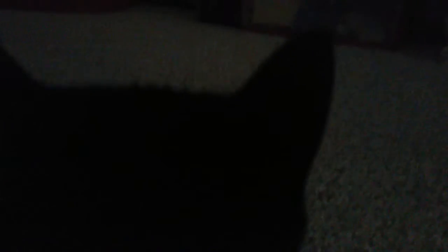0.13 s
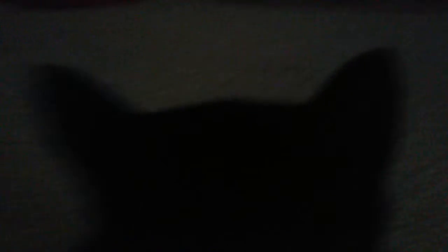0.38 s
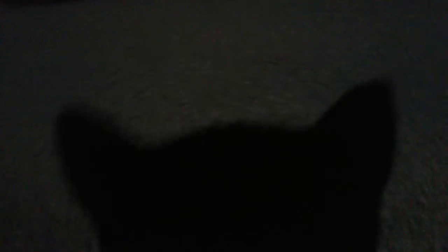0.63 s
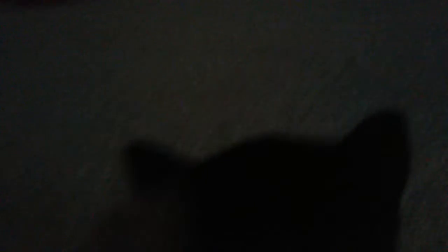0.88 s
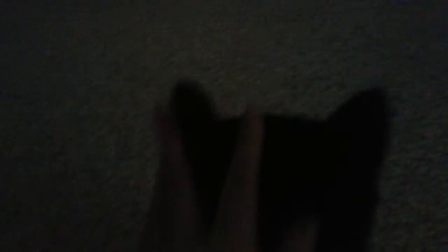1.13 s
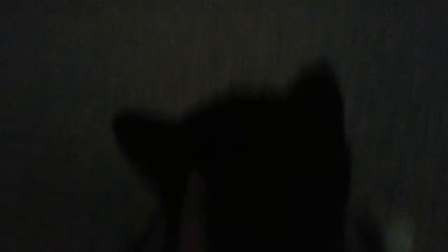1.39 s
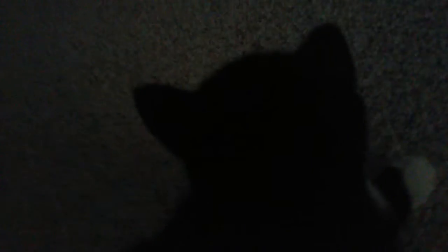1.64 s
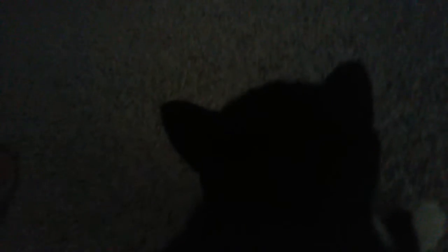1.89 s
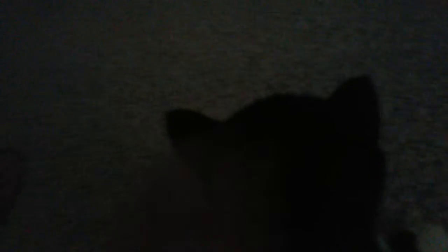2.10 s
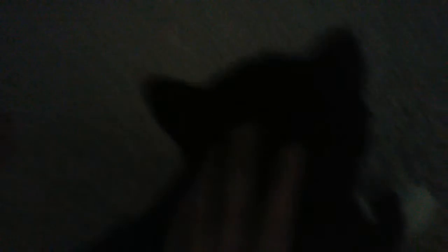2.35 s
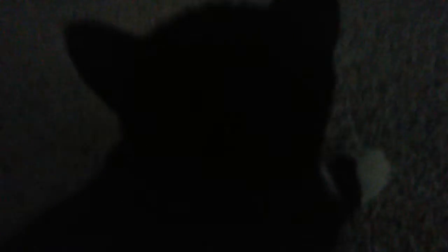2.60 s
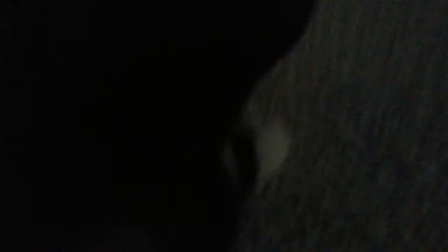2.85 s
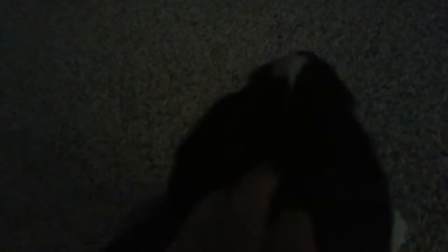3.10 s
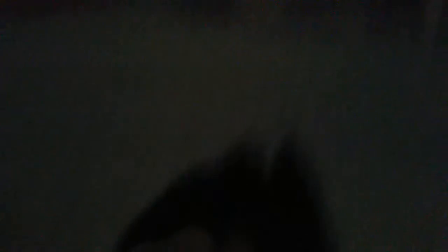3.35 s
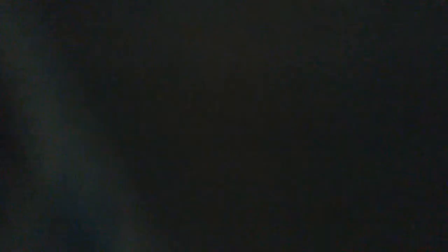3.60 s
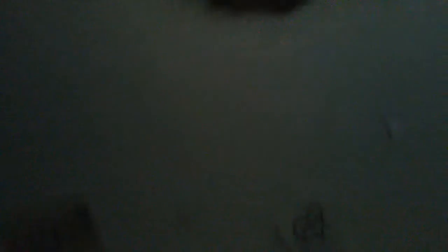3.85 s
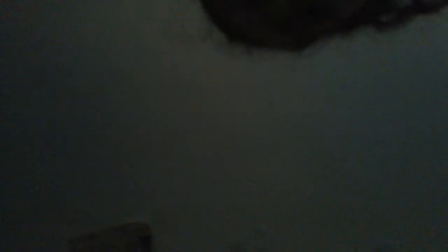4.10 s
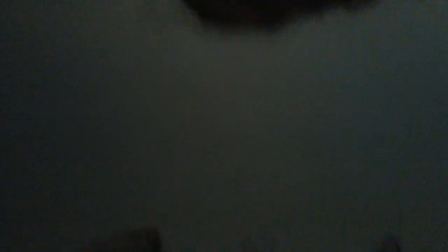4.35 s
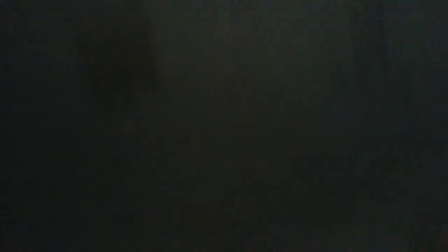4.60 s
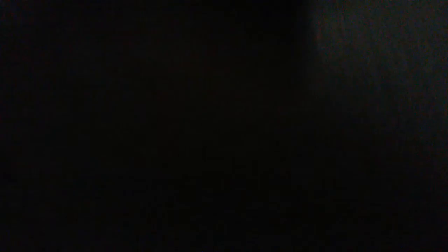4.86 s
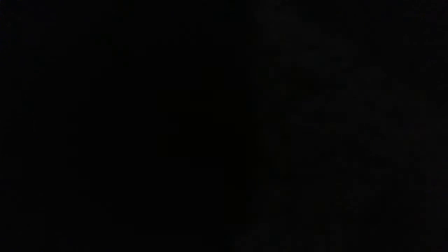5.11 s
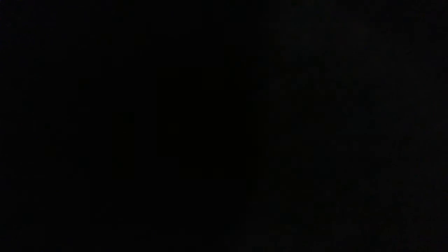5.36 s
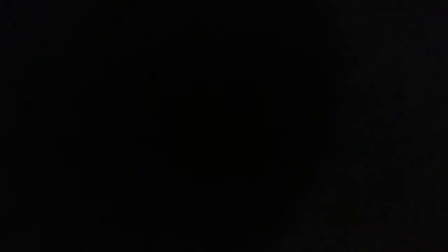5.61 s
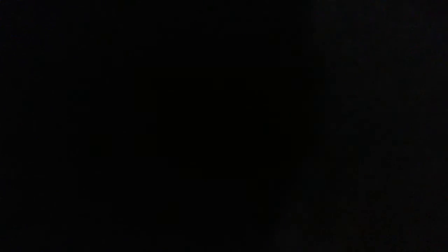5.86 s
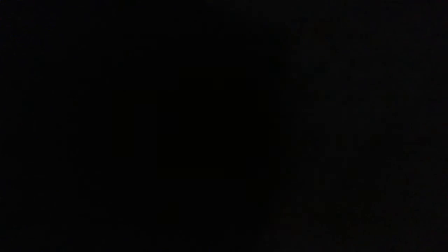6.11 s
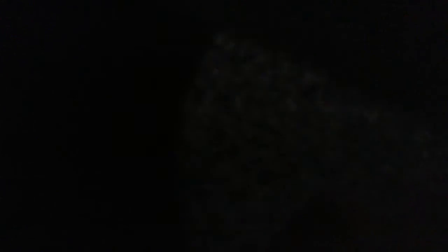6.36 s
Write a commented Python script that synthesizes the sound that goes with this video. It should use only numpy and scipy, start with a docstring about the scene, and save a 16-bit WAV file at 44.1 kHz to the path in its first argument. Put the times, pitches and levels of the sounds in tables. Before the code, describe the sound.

Close handling knocks and thumps on a hollow plastic case, with fur scuffs between them, over faint gritty hiss in a quiet carpeted room.

```python
"""A cat bumps and paws at a small hand-held camera in a quiet carpeted room, for six and a half seconds.
Light taps ring the plastic case up to one solid knock at 0.7 s, then comes a lull of faint hiss and hum.
A sharp bump breaks it at 2.8 s; the heaviest blows and thumps, with rough scuffing, crowd in from 3.5 to 4.1 s.
Lighter taps and strokes follow, with one firmer knock at 5.1 s: knocks ring damped case modes, thumps are low
swings, and strokes are dense tiny catches. The converter turns the quiet floor into a flicker between two steps."""
import sys
import numpy as np
from scipy import signal
from scipy.fft import rfft, irfft, next_fast_len
from scipy.io import wavfile
from scipy.ndimage import map_coordinates

SR = 44100
rng = np.random.default_rng(int(sys.argv[2]) if len(sys.argv) > 2 else 0)


def dump_mix(stems):
    """Bounce the given channels to the path in sys.argv[1] as a 16-bit WAV at rate SR."""
    frames = np.atleast_2d(stems).T  # one column per channel
    limited = np.clip(frames, -1, 1)  # hard clip at full scale
    pcm = np.round(limited * 32767).astype(np.int16)
    wavfile.write(sys.argv[1], SR, pcm)


def convert_level_to_amplitude(level_db):
    """Map a level in decibels to its linear amplitude factor."""
    exponent = np.asarray(level_db, float) / 20
    return 10 ** exponent


N = 285327

# resonances of the undamped plastic case: (frequency [Hz], level [dB], t60 [s])
CASE_MODES = [(216, -4, .035), (355, -2, 0.025), (520, -4.5, 0.02), (773, 0, 0.016), (1020, 2.5, 0.012),
              (1360, -3, 0.017), (1565, -8, .02), (2050, -1.5, 0.015), (2410, -5.5, .016),
              (2910, -10.5, .012), (3827, -18.5, 0.016), (6850, -18.5, 0.012)]


def rms_one(x):
    """Scales a signal to rms 1."""
    return x / np.sqrt(np.mean(x ** 2) + 1e-30)


def band(x, low_hz, high_hz):
    """Gentle band-pass."""
    return signal.sosfilt(signal.butter(2, [low_hz, high_hz], "band", fs=SR, output="sos"), x)


def coloured(x, spectrum):
    """Shapes a signal by a spectrum of (frequency [Hz], density [dB per Hz]) points; rms 1."""
    size = next_fast_len(N)
    hz, db = np.transpose(spectrum)
    bin_hz = np.maximum(np.arange(size // 2 + 1) * SR / size, 1)
    gain = convert_level_to_amplitude(np.interp(np.log(bin_hz), np.log(hz), db))
    return rms_one(irfft(rfft(x, size) * gain, size)[:N])


def drift(points_per_s):
    """Smooth random wandering; rms 1."""
    points = rng.standard_normal(int(N / SR * points_per_s) + 2)
    return rms_one(map_coordinates(points, [np.arange(N) * points_per_s / SR], order=3))


def ring(clicks, hz, t60):
    """A two-pole resonator: a unit click sets a dying sine of about height 1 ringing."""
    decay, turn = convert_level_to_amplitude(-60 / (t60 * SR)), 2 * np.pi * hz / SR
    poles = [1, -2 * decay * np.cos(turn), decay ** 2]
    return signal.lfilter([0, np.sin(turn)], poles, clicks + 1e-18)


def grains(per_s, spread_db):
    """Tiny random catches of hair and skin on the shell; rms 1."""
    sizes = convert_level_to_amplitude(spread_db * np.minimum(rng.exponential(1, N), 4))
    signs = rng.choice([-1, 1], N)
    return rms_one(sizes * signs * (rng.random(N) < per_s / SR))


def add(out, start_s, piece):
    """Mixes a piece into the track from a given time."""
    at = round(start_s * SR)
    out[at:at + len(piece)] += piece[:N - at]


def contact(contact_hz):
    """A contact drives the case modes near its own pitch most and those further away less."""
    ratio = np.transpose(CASE_MODES)[0] / contact_hz
    return ratio ** 1.294 / (1 + ratio ** 2.795)


def taps():
    """The case is pressed in, springs back and rings; a hard edge adds a brief crack at the peak."""
    # knocks on the case: (peak time [s], peak level [dB], contact pitch [Hz], crack relative to knock [dB])
    knocks = [(0.0601, -41, 437, -34), (0.0925, -39, 318, -33), (0.1221, -38, 343, -30),
              (0.155, -42, 306, -36), (0.2048, -37, 303, -36), (0.2203, -42, 300.0, -36),
              (0.2714, -43.5, 306, -25), (0.3607, -30.5, 870, -14), (0.4258, -43, 376, -38),
              (0.4766, -39, 332, -26), (0.5656, -32, 400, -6.5), (0.5807, -37.5, 450, -36),
              (0.6495, -29.5, 580, -42), (0.6877, -7.5, 330, -30), (0.7466, -35.5, 270.5, -36),
              (2.8405, -36.5, 1271, -7.5), (2.8452, -31, 286, -29), (2.8602, -10, 272, -28),
              (2.867, -25, 1500, -1), (2.8744, -15.5, 370, 3.5), (2.932, -50, 1500, 8.5),
              (2.9541, -32.5, 910, -25), (3.0224, -39, 364, -6), (3.0622, -42, 277, -36),
              (3.1605, -71, 935, 5.5), (3.173, -51.5, 900, 0.5), (3.1835, -66.5, 900, 8),
              (3.2354, -45, 587, -36), (3.3621, -26, 743, -23.5), (3.5279, -17, 373, -28.5),
              (3.5402, -9, 325, -25), (3.5468, -13, 316, -33.5), (3.5598, -7, 596, -17.5),
              (3.5627, 5, 810, -26), (3.7105, -12, 325, -11), (3.7838, 1.5, 486, -19),
              (3.8668, -16, 507, -28), (3.8723, 3, 410, -28), (3.8793, -13, 300, -19),
              (3.8973, -20.5, 350.0, -26), (3.9954, -30.5, 580, -41), (4.001, -23, 610, -15.5),
              (4.109, -11.5, 520.0, -25.5), (4.2684, -44.5, 330.0, -36), (4.3904, -49.5, 470.0, -35),
              (4.7347, -43, 915, -22), (4.8644, -39.5, 630.0, -28), (5.0836, -22.5, 260.0, -32.5),
              (5.0895, -45.5, 897, 12), (5.0962, -32, 1528, 0.5), (5.1035, -37.5, 1514, -5.5),
              (5.2274, -55, 620.0, -13), (5.549, -39.5, 353.4, -35.5), (5.6944, -45, 340.0, -33.5),
              (5.731, -47.5, 646, -24.5), (5.7576, -38.5, 610.0, -18), (6.157, -55.5, 995, -20.5)]
    out, t = np.zeros(N), np.arange(2200) / SR
    hz, mode_db, t60 = np.transpose(CASE_MODES)[:, :, None]
    # the paw stays on the case after a blow and damps the ring
    rings = np.sin(2 * np.pi * hz * t) * convert_level_to_amplitude(mode_db - 60 * t / (0.55 * t60))
    strengths = convert_level_to_amplitude(rng.normal(0, 3, (len(knocks), len(CASE_MODES))))
    noise = rng.standard_normal((len(knocks), len(t)))
    for k, (peak_s, peak_db, contact_hz, crack_db) in enumerate(knocks):
        press_in = -np.expm1(-t * contact_hz * 2.2)
        knock = (contact(contact_hz) * strengths[k]) @ rings * press_in
        knock = band(knock, 99, 4.6 * contact_hz)  # a soft pad rounds the edge of the blow
        crack = band(noise[k] * convert_level_to_amplitude(-60 * t / 0.0042), 2800, 12000)
        knock_peak = np.abs(knock).max()
        add(out, peak_s - np.abs(knock).argmax() / SR, convert_level_to_amplitude(peak_db) * knock / knock_peak)
        add(out, peak_s - 0.0007, convert_level_to_amplitude(peak_db + crack_db) * crack / np.abs(crack).max())
    return out


def thumps():
    """The whole camera rocks in the hand: a damped low swing with a soft start."""
    # swings of the body in the grip: (start time [s], peak level [dB], frequency [Hz], t60 [s])
    swings = [(0.089, -52, 187, 0.073), (0.118, -60, 178, 0.069), (0.156, -41.5, 194, 0.022),
              (0.21, -47, 172.5, 0.17), (0.27, -40, 225, 0.031), (0.477, -45, 66, 0.035),
              (0.564, -38, 125, 0.072), (0.648, -38.5, 132, 0.089), (0.69, -11.5, 97.9, 0.13),
              (0.743, -39.5, 125.4, 0.15), (2.842, -10.5, 98.5, 0.078), (2.86, -5.5, 101, 0.023),
              (2.925, -38, 49, 0.21), (3.019, -44.5, 171, 0.071), (3.06, -45, 169, 0.095),
              (3.14, -54.5, 151.7, 0.07), (3.353, -42.5, 211, 0.17), (3.55, -11, 198, 0.088),
              (3.566, -5.5, 123, 0.028), (3.712, -25.5, 212, 0.1), (3.792, -13.5, 152, 0.071),
              (3.871, -6.5, 125.3, 0.061), (3.897, -15, 109, 0.067), (3.997, -29, 218, 0.05),
              (4.109, -20.5, 182, 0.058), (4.25, -47, 88.8, 0.08), (4.312, -50.5, 142.5, 0.087),
              (4.336, -41, 120, 0.13), (4.391, -49, 120.7, 0.055), (4.82, -54, 102.2, 0.08),
              (5.081, -19.5, 199, 0.053), (5.086, -18, 131, 0.085), (5.515, -34.5, 103, 0.18),
              (5.685, -45.5, 118.6, 0.16), (5.752, -49.5, 191, 0.12), (5.89, -51, 109, 0.17)]
    wrist_hz, wrist_db, wrist_t60_s = 62.6, -11.5, 0.04
    out, t = np.zeros(N), np.arange(SR // 3) / SR
    # the wrist gives way too, with a swing of its own
    wrist = np.sin(2 * np.pi * wrist_hz * t) * convert_level_to_amplitude(wrist_db - 60 * t / wrist_t60_s)
    for start_s, peak_db, hz, t60 in swings:
        soft_start = -np.expm1(-t * hz * 3.4)
        swing = np.sin(2 * np.pi * hz * t) * convert_level_to_amplitude(-60 * t / t60) * soft_start
        swing = band(swing + wrist, 39, 1200)
        add(out, start_s, convert_level_to_amplitude(peak_db) * swing / np.abs(swing).max())
    return out


def rubbing():
    """Fur, paw and fingers stroke the shell: dense catches excite its modes, finer ones hiss in the treble."""
    # strokes, levels before pressure and unevenness:
    # (start time [s], length [s], scuff level [dB], contact pitch [Hz], fur hiss level [dB])
    strokes = [(0.022, 0.23, -63.5, 385, -73.5), (0.205, 0.3, -70, 2130, -88),
               (0.173, 0.22, -52.5, 344, -70.5), (0.408, 0.064, -69.5, 1520, -77),
               (0.351, 0.16, -58.5, 396, -78), (0.46, 0.19, -72, 565, -77), (0.558, 0.057, -57, 487, -86),
               (0.603, 0.036, -52, 1510, -53.5), (0.634, 0.02, -56.5, 1000, -62),
               (0.643, 0.034, -39, 856, -50.5), (0.671, 0.02, -34.5, 820, -45),
               (0.689, 0.016, -20, 2400, -34), (0.688, 0.2, -64, 347, -73.5),
               (0.801, 0.24, -77.5, 966, -66.5), (1.399, 0.48, -82.5, 980, -97.5),
               (2.738, 0.19, -83.5, 730, -90.5), (2.821, 0.024, -59, 291, -80),
               (2.852, 0.0104, -35.5, 434, -46), (2.857, 0.041, -36.5, 414, -41.5),
               (2.892, 0.046, -59.5, 810, -60.5), (2.926, 0.078, -49, 890, -54),
               (2.986, 0.12, -57.5, 395, -73), (3.043, 0.22, -71.5, 550, -78),
               (3.325, 0.11, -51.5, 564, -72.5), (3.394, 0.17, -59, 584, -80.5),
               (3.523, 0.05, -33.5, 412, -54), (3.559, 0.063, -34.5, 930, -42),
               (3.594, 0.062, -29.5, 800, -66), (3.614, 0.056, -24.5, 1400, -33),
               (3.658, 0.019, -43, 1300, -50), (3.629, 0.14, -32.5, 691, -40),
               (3.746, 0.059, -33, 606, -50), (3.794, 0.056, -46, 322, -64.5),
               (3.836, 0.15, -41.5, 480, -61.5), (3.953, 0.15, -57, 544, -66.5),
               (4.076, 0.12, -55, 560, -64), (4.131, 0.12, -64.5, 720, -70.5),
               (4.233, 0.092, -62.5, 342, -79), (4.33, 0.13, -61.5, 615, -93.5),
               (4.442, 0.15, -60.5, 1000, -77), (4.548, 0.098, -63, 1000, -77.5),
               (4.623, 0.094, -73, 520, -95), (4.722, 0.066, -66.5, 542, -83.5),
               (4.761, 0.122, -53.5, 526, -72.5), (4.853, 0.099, -55.5, 1000, -64.5),
               (4.921, 0.088, -73, 855, -83), (5.068, 0.13, -57.5, 880, -57.5),
               (5.171, 0.094, -74, 723, -90), (5.3, 0.18, -73.5, 700, -99.5), (5.511, 0.055, -64, 570, -76),
               (5.536, 0.09, -64, 500, -65), (5.597, 0.096, -70.5, 830, -86),
               (5.688, 0.061, -63.5, 560, -74.5), (5.712, 0.11, -55, 750, -73.5),
               (5.871, 0.118, -74.5, 580, -81.5), (5.968, 0.21, -82.5, 930, -77),
               (6.093, 0.35, -79, 860, -85.5)]
    # fur hiss of a light touch, then of a firm one: (frequency [Hz], relative density [dB per Hz])
    fur_spectra = [
        [(1650, -43), (2800, -11.5), (3710, -11), (4820, -9), (5990, -15), (7230, -1), (10000, -13.5),
         (13800, -17), (15800, -21.5)],
        [(1410, -27.5), (2400, -3.5), (2680, -1), (3670, -1.5), (5450, -7.5), (6330, -11.5), (7130, -4.5),
         (10000, -19), (14300, -16.5), (15800, -22.5)],
    ]
    peak_share = 0.45  # a stroke presses hardest after this share of its length
    divide_below, multiply_above = 6.2, 2.7  # scuff band edges relative to the contact pitch
    out = np.zeros(N)
    catches = grains(6000, spread_db=1.0)
    # the rubbing touch damps the modes
    modes = np.array([convert_level_to_amplitude(db) * ring(catches, hz, 0.53 * t60) for hz, db, t60 in CASE_MODES])
    modes[1::2] *= -1
    hairs = grains(15000, spread_db=2.0)
    light, firm = (coloured(hairs, spectrum) for spectrum in fur_spectra)
    uneven = convert_level_to_amplitude(2.2 * drift(140) + 1.4 * drift(35))
    strengths = convert_level_to_amplitude(rng.normal(0, 2, (len(strokes), len(CASE_MODES))))
    for (start, length, scuff_db, contact_hz, fur_db), strength in zip(strokes, strengths):
        peak, end = start + peak_share * length, start + length
        at = np.arange(round(start * SR), round(end * SR))
        rise_and_fall = np.interp(at / SR, [start, peak, end], [0, 1, 0])
        pressure = np.sin(np.pi / 2 * rise_and_fall) ** 1.8
        scuff = contact(contact_hz) ** 0.9 * strength @ modes[:, at]
        # the sliding contact picks out the region of its own pitch
        scuff = rms_one(band(scuff, contact_hz / divide_below, contact_hz * multiply_above))
        # a louder hiss takes on the spectrum of a firmer touch
        firmness = np.clip((fur_db + 57) / 14, 0, 1)
        fur = firmness * firm[at] + (1 - firmness) * light[at]
        add(out, start, pressure * uneven[at] * (convert_level_to_amplitude(scuff_db) * scuff + convert_level_to_amplitude(fur_db) * fur))
    return out


def grip():
    """Shifting pressure of the holding hand rumbles through the body as low noise."""
    # how much the hand shifts, before a random waver: (time [s], level [dB])
    hand_shifts = [(0.0, -76.5), (0.12, -77), (0.24, -57), (0.55, -67.5), (0.63, -50.5), (0.88, -62.5),
                   (0.96, -84), (2.78, -84), (2.95, -58.5), (3.15, -61.5), (3.3, -92), (3.4, -71.5),
                   (3.58, -51), (3.7, -29), (3.8, -50), (3.94, -54.5), (4.08, -60.5), (4.21, -58.5),
                   (4.31, -73), (4.46, -66.5), (4.87, -74.5), (5.45, -83), (5.55, -69.5), (5.76, -66.5),
                   (5.9, -80), (6.2, -83.5)]
    # rumble colour: (frequency [Hz], relative density [dB per Hz])
    rumble_spectrum = [(12, -35), (20, -7), (97, -2.5), (157, -4.5), (221, -5.5), (262, -10), (300, -9.5),
                       (390, -38.5), (660, -120)]
    level_db = np.interp(np.arange(N) / SR, *np.transpose(hand_shifts))
    return coloured(rng.standard_normal(N), rumble_spectrum) * convert_level_to_amplitude(level_db + 3.4 * drift(25))


def room(x):
    """The walls answer every contact with a faint dying wash of noise."""
    # the air hears the case brighter than the shell does: (frequency [Hz], relative density [dB per Hz])
    wash_spectrum = [(100, -32), (300, -24), (1000, -16), (2000, -15), (5000, -5), (8000, -6), (13000, 4.5),
                     (16000, 2)]
    level_db, t60_s, build_up_s = -24, 0.77, 0.0066
    t = np.arange(N) / SR
    answer = coloured(rng.standard_normal(N), wash_spectrum) * convert_level_to_amplitude(-60 * t / t60_s)
    answer = answer * -np.expm1(-t / build_up_s)
    answer = answer[:SR] / np.sqrt(np.sum(answer ** 2))
    return convert_level_to_amplitude(level_db) * signal.fftconvolve(x, answer)[:N]


def treble_swells():
    """Faint narrow-band noise near 7.3 kHz swells now and then, like very light strokes of fur."""
    # rounded swells added to a fainter steady level: (peak time [s], level [dB], half length [s])
    swells = [(0.266, -74, 0.091), (0.939, -77.5, 0.14), (1.321, -82, 0.13), (1.544, -83.5, 0.11),
              (1.799, -82.5, 0.1), (2.125, -81, 0.063), (2.553, -84, 0.22), (4.164, -76, 0.05),
              (5.0, -80, .08), (6.001, -83, .1)]
    steady_db, treble_hz, treble_width_hz = -101, 7350, 1100
    t = np.arange(N) / SR
    low_hz, high_hz = treble_hz - treble_width_hz / 2, treble_hz + treble_width_hz / 2
    treble = rms_one(band(rng.standard_normal(N), low_hz, high_hz))
    treble_level = np.full(N, convert_level_to_amplitude(steady_db))
    for peak_s, db, half_s in swells:
        treble_level += convert_level_to_amplitude(db) * np.clip(1 - ((t - peak_s) / half_s) ** 2, 0, 1)
    return treble_level * treble


def microphone_hiss():
    """The microphone's own noise: steady and coloured."""
    # hiss colour: (frequency [Hz], relative density [dB per Hz])
    hiss_spectrum = [(12, -4.5), (25, -4.5), (50, -5), (100, -1.5), (200, -1.5), (500, -9.5), (1000, -7),
                     (2000, -10), (5000, -18.5), (7500, -16), (10000, -18), (15600, -15), (16300, -42)]
    return convert_level_to_amplitude(-84) * coloured(rng.standard_normal(N), hiss_spectrum)


def mains_hum():
    """A faint mains tone whose phase and level waver."""
    hum_hz, level_db, waver_db, slip_rad = 120, -81, 2, 0.7
    t = np.arange(N) / SR
    tone = np.sqrt(2) * np.sin(2 * np.pi * hum_hz * t + slip_rad * drift(6.6))
    return tone * convert_level_to_amplitude(level_db + waver_db * drift(6.0))


def scene():
    """Handling and its echo in the room, over grip rumble, treble swells, hiss and hum; one channel."""
    handling = taps() + thumps() + rubbing()
    background = grip() + treble_swells() + microphone_hiss() + mains_hum()
    return (handling + room(handling) + background)[None]


def coarse_steps(x):
    """The converter rounds down to coarse steps, so the faint floor flickers between two of them."""
    step, offset = 15 / 32768, -0.000024  # of full scale
    return step * np.floor((x + offset) / step)


def roll_off(x):
    """The treble ends steeply here."""
    return signal.sosfilt(signal.butter(12, 16510, fs=SR, output="sos"), x)


def record(dry):
    """Peaks are rounded, the converter is coarse, the top is cut."""
    rounded = 0.9 * np.tanh(dry / 0.9)
    # 70 dB down from 16400 Hz
    top_cut = signal.cheby2(12, 70, 16400, fs=SR, output="sos")
    mix = signal.sosfilt(top_cut, coarse_steps(rounded))
    return roll_off(mix)


dry = scene()
out = record(dry)
dump_mix(out)
```